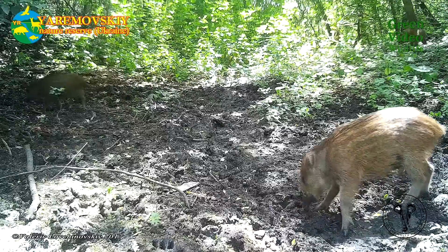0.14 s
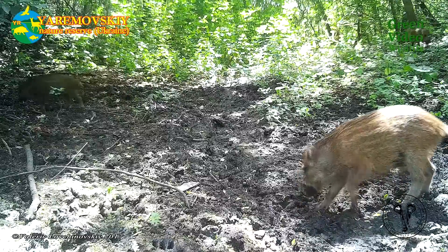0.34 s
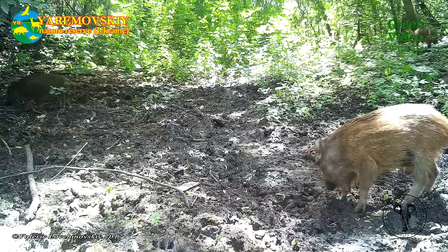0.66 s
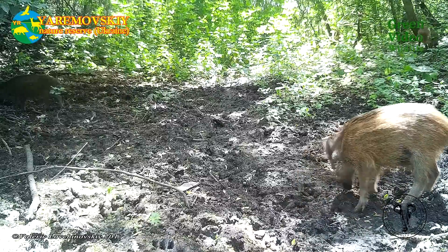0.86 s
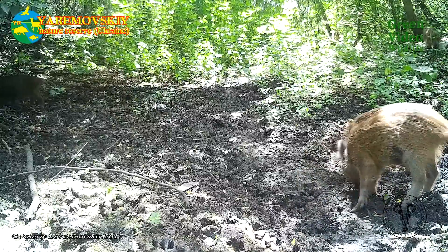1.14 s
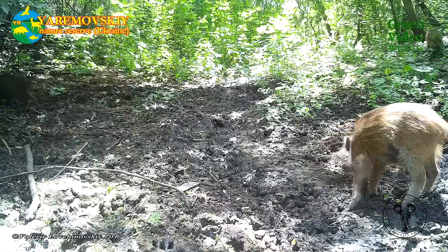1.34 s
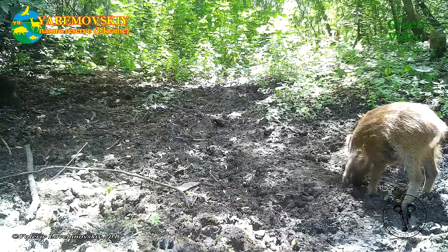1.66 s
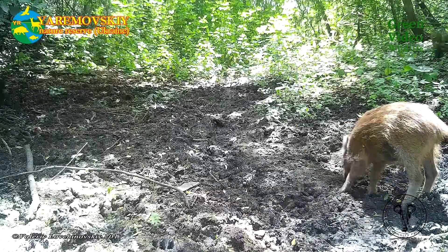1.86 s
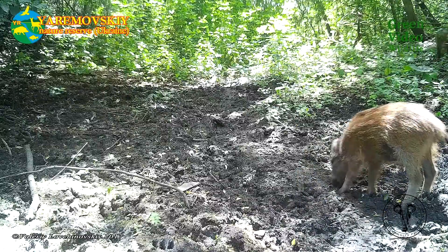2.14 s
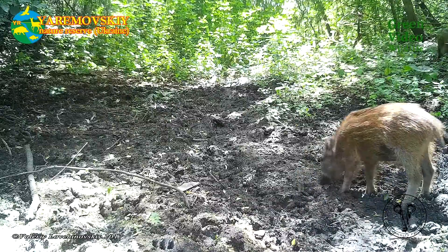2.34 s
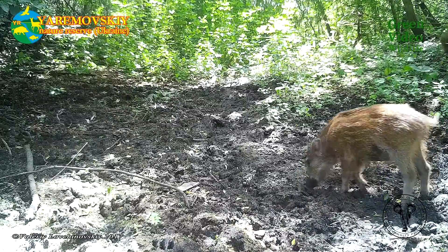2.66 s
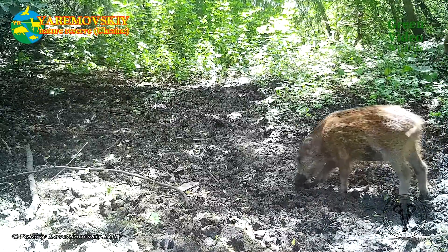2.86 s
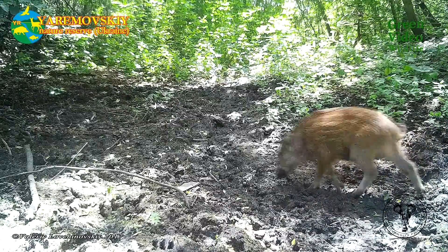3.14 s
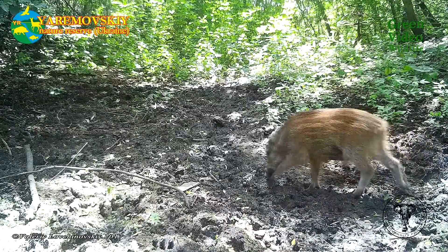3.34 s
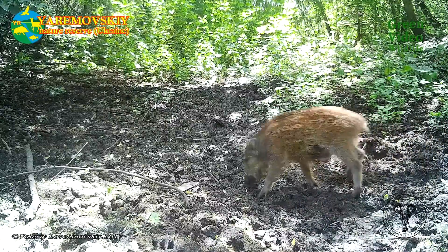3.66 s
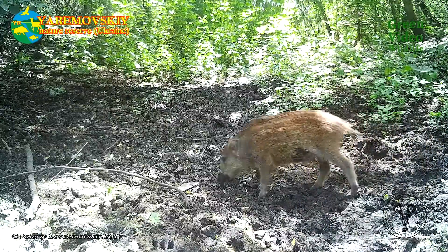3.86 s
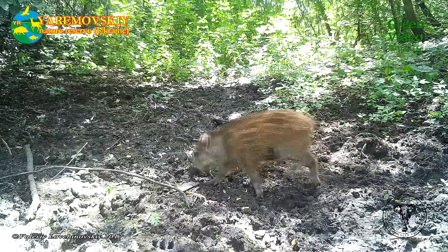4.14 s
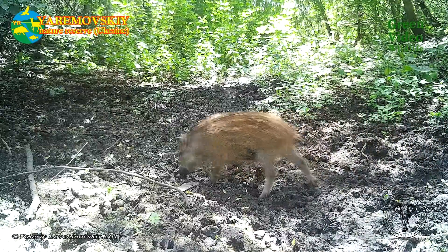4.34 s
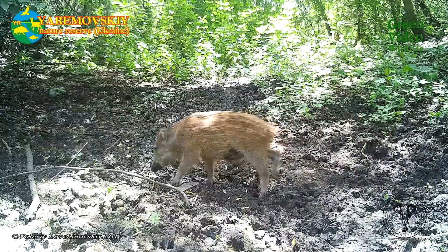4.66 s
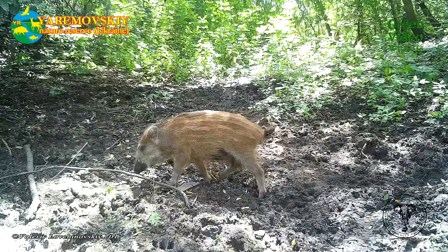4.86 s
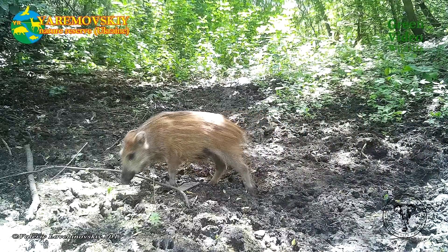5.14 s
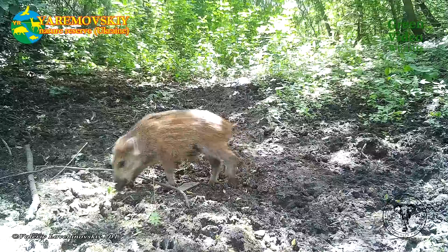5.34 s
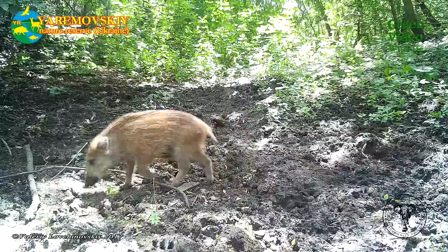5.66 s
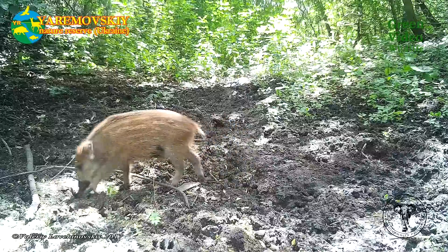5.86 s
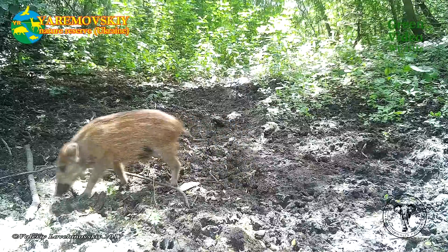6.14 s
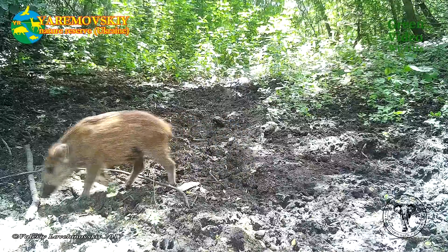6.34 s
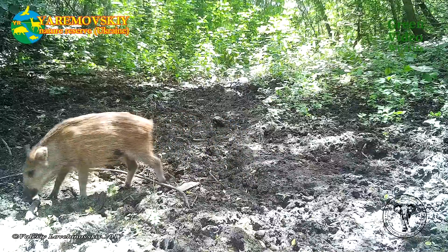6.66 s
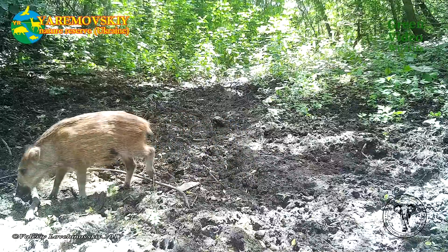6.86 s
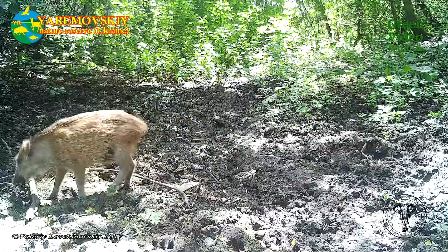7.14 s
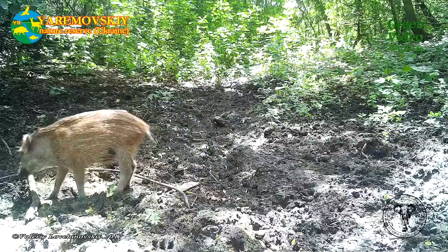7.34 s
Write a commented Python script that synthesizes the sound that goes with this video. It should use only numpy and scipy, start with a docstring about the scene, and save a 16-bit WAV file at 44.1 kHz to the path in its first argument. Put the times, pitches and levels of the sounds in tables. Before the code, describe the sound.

A wild boar piglet grunts in short bursts and roots through crackling forest litter, over a steady hiss of leaves.

```python
"""A muddy forest clearing, where a wild boar piglet roots about close by. Its short grunts follow the
source-filter principle: flapping throat tissue drives the resonances of throat, mouth and snout, while
mucus clicks in the nostrils. Two longer snores rattle through the nose; one soft grunt sounds further off.
Twigs snap and litter crackles under snout and hooves, and the trunks return a faint echo.
Behind it all, a breeze moves low air and keeps the leaves hissing."""
import sys
import numpy as np
from scipy import signal
from scipy.fft import rfft, irfft, next_fast_len
from scipy.io import wavfile
from scipy.ndimage import map_coordinates

SR = 44100
rng = np.random.default_rng(int(sys.argv[2]) if len(sys.argv) > 2 else 0)


def put_to_file(sound):
    """Save the sound as 16-bit audio at rate SR, in the file named by the first command-line argument."""
    columns = np.atleast_2d(sound).T  # one column per channel
    safe = np.clip(columns, -1, 1)
    whole_steps = np.round(safe * 32767)
    wavfile.write(sys.argv[1], SR, whole_steps.astype(np.int16))


N = 331191

# Grunts: start_s, end_s, hardest_slap_s, slap_gap_s, slap_fall_db, flutter_db, throat_hz, throat_db,
# mouth_db, snout_hz, snout_db, brightness_db, nostril_hz, nostril_db
GRUNTS = [(0.177, 0.229, 0.204, 0.018, 5, 2, 355, -15.5, -31, 1300, -37.5, 1.5, 5380, -29),
          (0.562, 0.636, 0.603, 0.015, 2.5, -10, 354.5, -19.5, -38, 1320, -33.5, -1, 4790, -26),
          (0.866, 0.941, 0.901, 0.015, 4.5, 1, 389.4, -16.5, -25, 1148, -32, -2, 5080, -29),
          (1.153, 1.195, 1.193, .02, 5, -4, 504, -16.5, -21.5, 1280, -31, 5, 5060, -28),
          (1.445, 1.505, 1.463, .031, 2.5, -13.5, 484, -20.5, -26.5, 1240, -43, 11.5, 5300, -37),
          (1.8, 1.872, 1.836, .024, 4.5, -12, 474, -18, -31, 1127, -31, 5.5, 5020, -29),
          (2.385, 2.441, 2.407, .016, 2, -12, 531.3, -21, -30.5, 1320, -34.5, -2, 4930, -29),
          (2.763, 2.811, 2.764, .02, 3, -16.5, 440.5, -14.5, -35, 1100, -26, -1, 4580, -26),
          (3.124, 3.174, 3.158, .016, 2.5, -10, 400.4, -15.5, -29, 1133, -31, -4, 4500, -29.5),
          (4.037, 4.098, 4.069, 0.024, 7, -16, 413.7, -24, -36.5, 1290, -42.5, -6, 4650, -33.5),
          (4.424, 4.478, 4.462, 0.02, 16, -14.5, 401.6, -16.5, -39, 1120, -35, -0.5, 4550, -40),
          (4.75, 4.815, 4.781, 0.008, 5, -3, 347.7, -23, -35, 1100, -49, -5, 4880, -27.5)]
# Resonances of the snout: frequency_ratio, level_db, brightness_share
SNOUT_MODES = [(1, -3.5, -0.77), (1.51, 0.5, -0.14), (1.98, 0, 0.95), (2.55, -8.5, 0.91)]
# Bandwidths of the throat, mouth, four snout and nostril resonances: width_hz
TRACT_WIDTHS = [63, 85, 49.6, 59.5, 191, 202, 254]
# Resonances of the soft walls behind the tongue: centre_hz, width_hz, level_db
PHARYNX_MODES = [(305, 71, -2), (151.6, 21, -1)]
# Snore envelopes, one list each: time_s, throat_db, nostril_db
SNORES = [
    [(1.913, -23, -22), (1.917, -21.5, -21), (1.947, -20.5, -19.5), (2.033, -24, -23.5),
     (2.163, -24, -26.5), (2.175, -19, -16), (2.195, -23.5, -28)],
    [(3.2, -37, -29), (3.214, -31, -34), (3.265, -30.5, -37), (3.298, -27.5, -28), (3.35, -30, -42)],
]
# Throat resonances in a snore: centre_hz, width_hz, level_db
SNORE_THROAT_MODES = [(162, 140, -1), (300, 45, 3), (2500, 200, -10.5)]
# Gliding mouth resonances, one list per snore: start_hz, end_hz, width_hz, level_db
SNORE_GLIDES = [
    [(525, 565, 87, -1.5), (1380, 1580, 48, -9), (2840, 3060, 170, -8.5)],
    [(444, 600, 92, -1), (259, 63, 50, -2.5), (1270, 1630, 94, -9)],
]
# Nostril resonances in a snore: centre_hz, width_hz, level_db
SNORE_NOSTRIL_MODES = [(4670, 440, 4.5), (5760, 740, -3.5), (7200, 900, -12)]
# Prominent wet clicks in the nostrils: time_s, level_db
CLICKS = [(0.187, -12), (0.2045, -8), (0.588, 0.5), (0.622, -5.5), (0.631, -6), (0.65, -6.5),
          (0.8705, -9.5), (0.921, -8), (0.95, -4), (0.9556, -5.5), (1.162, -8.5), (1.4665, -8), (1.818, 1),
          (2.173, -2.5), (2.7654, -1), (2.803, -8), (4.0705, -11.5), (4.462, -7)]
# Prominent snaps of twigs and dry leaves: time_s, level_db, pitch_hz
SNAPS = [(.185, -6, 13000), (.7452, -5, 11000), (0.87, -4.5, 9700), (2.568, -7.5, 11800),
         (3.46, -9.5, 5200), (3.503, -9.5, 6200), (3.637, -11, 2800), (4.047, 0, 10900),
         (4.427, -13.5, 9050), (5.046, -14, 5960), (5.078, -5, 9000), (5.494, -13, 8150), (5.56, -6, 6440),
         (6.941, -10.5, 3900)]
# Scuffs of snout and hooves: middle_s, level_db, pitch_hz, width_hz, half_length_s
SCUFFS = [(1.771, -36, 7600, 900, 0.062), (2.29, -33, 5500, 3500, 0.025), (3.501, -28.5, 4000, 5000, 0.025),
          (3.819, -32, 10000, 5000, 0.048), (5.238, -29, 4500, 5000, 0.049),
          (5.386, -29, 9000, 6000, 0.045), (5.571, -27, 3500, 3000, 0.027), (5.905, -28, 3500, 4000, 0.042),
          (6.078, -29.5, 6000, 7000, 0.042), (6.792, -29, 9700, 3500, 0.066)]
# Bouts of rooting: start_s, end_s, level_db
ROOTING_BOUTS = [(0.725, 1.0, -38.5), (1.73, 2.267, -34.5), (3.52, 3.75, -42), (4.93, 5.103, -30.5),
                 (5.3, 5.65, -38)]
# Spectrum of stirred litter: frequency_hz, level_db
LITTER_SPECTRUM = [(1500, -6), (3500, -1), (5500, 6), (8000, 3.5), (11000, -4.5), (15000, -14)]
# Contour of the distant grunt: time_s, pitch_hz, level_db
FAR_GRUNT = [(0.02, 252.5, -63), (0.039, 254, -27), (0.07, 263, -44), (0.088, 282, -26.5), (0.13, 266, -42)]
# Strength of the breeze, heard as leaf hiss: time_s, level_db
BREEZE_LEVELS = [(0.1, -31.5), (0.5, -35.5), (0.8, -31), (1.3, -32), (2.5, -32.5), (2.66, -34.5),
                 (2.95, -31), (3.6, -31), (4.2, -31.5), (5.6, -30), (7.3, -30.3), (7.5, -33)]
# Spectrum of low moving air: frequency_hz, level_db
AIR_SPECTRUM = [(12, -40), (20, -2.5), (54, 2), (80, -1), (245, -1), (339, -4), (400, -5), (622, -16),
                (1000, -14), (1300, -12.5), (2200, -120)]
# Spectrum of hissing leaves: frequency_hz, level_db
LEAF_SPECTRUM = [(290, -25), (500, 5), (545, 0.5), (676, 0.5), (914, -2), (2430, -0.5), (3630, 0),
                 (4380, -0.5), (6550, -2.5), (10100, -8.5), (14400, -22.5), (15500, -29)]
# Treble loss on the path from the ground: frequency_hz, gain_db
PATH_GAIN = [(6000, 1), (8000, 1), (11000, -7.5), (15000, -16)]
# Reverberation time among the trunks: frequency_hz, t60_s
TRUNK_DECAY = [(150, 0.25), (600, 0.26), (4000, 0.42), (12000, 0.067)]

MOUTH_HZ, HARDEST_SLAP_DB = 689, -3


def grunts():
    """Resonances scale with length: those of the snout shift together as it stretches between grunts."""
    out = np.zeros(N)
    for start, end, hardest, gap, fall_db, flutter_db, *shape in GRUNTS:
        throat_hz, throat_db, mouth_db, snout_hz, snout_db, bright_db, nose_hz, nose_db = shape
        snout = [(snout_hz * ratio, snout_db + db + share * bright_db) for ratio, db, share in SNOUT_MODES]
        modes = [(throat_hz, throat_db), (MOUTH_HZ, mouth_db), *snout, (nose_hz, nose_db)]
        add(out, start, grunt(start, end, hardest, gap, fall_db, flutter_db, modes))
    return out


def grunt(start, end, hardest, gap, fall_db, flutter_db, modes):
    """Source and filter: soft flutter sustains the throat tone; hard slaps excite the higher resonances."""
    t = start + np.arange(int((end - start + 0.043) * SR)) / SR
    window = gate(t, start, end - .004, fade_s=0.01)
    slaps = palate_slaps(t, end, hardest, gap, fall_db)
    throat_hz = modes[0][0]
    flaps = amp(flutter_db) * window * flutter(t, throat_hz / 3, jitter=.12, scatter_db=1.0)
    # entrainment: the ringing throat pulls the flaps into step with itself
    beats = np.flatnonzero(flutter(t, throat_hz, jitter=0.062, scatter_db=0))
    locked = np.bincount(beats, np.add.reduceat(flaps, beats), len(t))
    # each slap lets a puff of turbulent air through
    puffs = decay(slaps, tau_s=0.0058) + .08 * window
    air = puffs * rng.standard_normal(len(t))
    sharp = 0.66 * slaps + 0.21 * flaps + 0.049 * air
    throat = highpass(locked + 0.68 * slaps + .013 * air, 0.43 * throat_hz)
    mouth_and_snout = [highpass(sharp, 0.68 * hz) for hz, _ in modes[1:-1]]
    nostrils = highpass(highpass(sharp + 0.098 * air, 2200), 2200)
    forces = [throat, *mouth_and_snout, nostrils]
    # the mouth opens a little, so the tract's resonances climb
    opening = 1 + 0.054 * (np.clip((t - start) / (end - start), 0, 1) - .5)
    voice = amp(-26.5) * unit(resonate(slaps + 0.58 * flaps + 0.016 * air, PHARYNX_MODES))
    for k, (force, (hz, db), width_hz) in enumerate(zip(forces, modes, TRACT_WIDTHS)):
        voice += (-1) ** k * amp(db) * unit(gliding(force, hz * opening, width_hz))
    voice *= np.sqrt((end - start) * SR / len(t))  # levels refer to the sounding part
    # the chest hums on briefly as the throat relaxes
    hum = gate(t, end, end + 0.011, fade_s=0.031) * rng.standard_normal(len(t))
    chest = amp(-33.5) * unit(highpass(cavity(hum, 145, 110), 75))
    return (voice + chest) * gate(t, start, t[-1] - .012, fade_s=.012)


def palate_slaps(t, end, hardest, gap, fall_db):
    """Impulsive excitation: the soft palate slaps shut, building to its hardest slap and easing off."""
    slaps = np.zeros(len(t))
    for k in range(-2, 3):
        time = hardest + k * (gap + 0.0004 * rng.standard_normal())
        if t[0] - .004 < time < end:
            add(slaps, time - t[0], amp([HARDEST_SLAP_DB - fall_db * k ** 2]))
    return slaps


def flutter(t, rate_hz, jitter, scatter_db):
    """Flapping tissue makes a quasi-periodic pulse train, uneven in period and amplitude."""
    gaps, sizes = rng.standard_normal((2, 256))
    at = np.round(np.cumsum(np.exp(jitter * gaps)) / rate_hz * SR).astype(int)
    at -= at[0]
    inside = at < len(t)
    return np.bincount(at[inside], amp(scatter_db * sizes)[inside], len(t))


def snores():
    """Forced vibration: a ragged rattle of the palate drives the throat, opening mouth and wet nostrils."""
    out = np.zeros(N)
    for envelope, glides in zip(SNORES, SNORE_GLIDES):
        start, end = envelope[0][0], envelope[-1][0]
        t = np.arange(start, end + .01, 1 / SR)
        throat_db, nostril_db = curves(envelope, t)
        rattle = flutter(t, rate_hz=190, jitter=.13, scatter_db=2.6)
        force = rattle + 0.013 * rng.standard_normal(len(t))
        throat = amp(-4.5) * unit(highpass(cavities(force, SNORE_THROAT_MODES), 120))
        for start_hz, end_hz, width_hz, db in glides:
            mouth = gliding(highpass(force, 0.67 * start_hz), np.linspace(start_hz, end_hz, len(t)), width_hz)
            throat += amp(db - 1.5) * unit(mouth)
        spray = decay(rattle, tau_s=.0009) * rng.standard_normal(len(t))
        nose = cavities(rattle + .14 * spray, SNORE_NOSTRIL_MODES)
        snore = amp(throat_db) * throat + amp(nostril_db) * unit(highpass(nose, 4400))
        add(out, start, snore * gate(t, start + 0.0032, end - .002, fade_s=0.005))
    return out


def nostril_clicks(extra_db=-10.5, spread_db=6.5):
    """Impulse response: bursting mucus films ring the nose at the nearest grunt's nostril resonance."""
    out, t = np.zeros(N), np.arange(SR // 30) / SR
    starts, ends, *_, nose_hz, _ = np.transpose(GRUNTS)
    extras = [(rng.uniform(start, end), rng.normal(extra_db, spread_db)) for start, end in zip(starts, ends)]
    for time, db in CLICKS + extras:
        burst = 0.1 * amp(-60 * t / 0.014) * rng.standard_normal(len(t))
        burst[0] += 1
        nearest = np.argmin(np.abs(starts - time))
        click = highpass(cavity(burst, nose_hz[nearest], width_hz=590), 3100)
        add(out, time, amp(db) * click / np.abs(click).max())
    return out


def snaps(faint_count=8, faint_db=-20.5, faint_hz=7150):
    """Brittle fracture: a twig or leaf releases its strain in a sharp crack and a short crumble."""
    out, t = np.zeros(N), np.arange(SR // 20) / SR
    faint = [(rng.uniform(0, N / SR), rng.normal(faint_db, 2.2), faint_hz * rng.lognormal(0, 0.27))
             for _ in range(faint_count)]
    for time, db, hz in SNAPS + faint:
        crack, crumble = amp(-60 * t / 0.0067), 0.2 * amp(-60 * t / 0.16)
        fracture = (crack + crumble) * rng.standard_normal(len(t))
        snap = highpass(resonate(fracture, [(hz, 2800, 0), (8000, 7000, -11)]), 1500)
        add(out, time, amp(db) * snap / np.abs(snap).max())
    return out


def scuffs(cracks_per_s=2500):
    """Shot noise: each push through the litter swells and fades as a cloud of tiny independent cracks."""
    out = np.zeros(N)
    for middle, db, hz, width_hz, half_length in SCUFFS:
        swell = np.hanning(int(2 * half_length * SR))
        cracks = (rng.random(len(swell)) < cracks_per_s / SR) * rng.standard_normal(len(swell))
        add(out, middle - half_length, amp(db) * swell * unit(resonate(cracks, [(hz, width_hz, 0)])))
    return out


def rooting(t, attack_s=.08, settle_s=0.16, rest_db=-44, grains_per_s=220):
    """Incoherent sources add in power: the snout stirs grains of litter in bouts, over a faint rustle."""
    power = amp(rest_db) ** 2
    for start, end, db in ROOTING_BOUTS:
        rise = np.clip((t - start) / attack_s + 1, 0, 1)
        settle = np.exp(-np.maximum(t - end, 0) / settle_s)
        power += (amp(db) * rise * settle) ** 2
    grains = (rng.random(N) < grains_per_s / SR) * rng.random(N) ** 2
    crumble = decay(grains, tau_s=0.014) + 0.13
    level = np.sqrt(power) * amp(1.5 * wobble(16))
    return level * unit(colour(crumble * rng.standard_normal(N), LITTER_SPECTRUM))


def far_grunt(t):
    """A soft closed-mouth note, nearly a pure tone: one sinusoid gliding in pitch and level."""
    hz, db = curves(FAR_GRUNT, t)
    tone = np.sqrt(2) * np.sin(2 * np.pi * np.cumsum(hz) / SR)
    return amp(db) * tone * gate(t, FAR_GRUNT[0][0], FAR_GRUNT[-1][0], fade_s=0.017)


def breeze(t, air_mean_db=-35.5, air_coupling=0.46):
    """Flow noise: one breeze modulates the hiss of the leaves and, more weakly, the low moving air."""
    leaf_db, = curves(BREEZE_LEVELS, t)
    air_db = air_mean_db + air_coupling * (leaf_db - leaf_db.mean())
    air = amp(air_db + 0.81 * wobble(6.4)) * unit(colour(rng.standard_normal(N), AIR_SPECTRUM))
    leaves = amp(leaf_db + 0.34 * wobble(8.1)) * unit(colour(rng.standard_normal(N), LEAF_SPECTRUM))
    return air + leaves


def trunk_echo(x):
    """Scattering from the trunks leaves a short diffuse tail, each band decaying at its own rate."""
    hz, t, bands = signal.stft(rng.standard_normal(SR // 2), SR, nperseg=256)
    bands = bands * amp(-60 * t / along(TRUNK_DECAY, hz)[:, None])
    _, tail = signal.istft(bands, SR, nperseg=256)
    return signal.fftconvolve(x, np.pad(tail, (400, 0)) / np.linalg.norm(tail))[:N]


def cavity(x, hz, width_hz):
    """An air cavity resonates at hz and attenuates what lies above."""
    return filtered(x, lambda f: hz * width_hz / (hz * hz - f * f + 1j * f * width_hz))


def cavities(x, modes):
    """Cavity modes add in parallel, alternating in sign."""
    return sum((-1) ** k * amp(db) * cavity(x, hz, width) for k, (hz, width, db) in enumerate(modes))


def gliding(x, hz, width_hz):
    """A damped resonator whose natural frequency moves while it rings."""
    turn = np.exp(2j * np.pi * np.cumsum(hz) / SR)
    return np.imag(turn * decay(x / turn, tau_s=1 / (np.pi * width_hz)))


def resonate(x, modes):
    """Band-pass resonances add in parallel."""
    return filtered(x, lambda f: sum(amp(db) * 1j * f * width / (hz * hz - f * f + 1j * f * width)
                                     for hz, width, db in modes))


def decay(x, tau_s):
    """Each impulse relaxes exponentially."""
    return signal.lfilter([1], [1, -np.exp(-1 / (tau_s * SR))], x)


def highpass(x, hz):
    """A causal second-order low cut."""
    return signal.sosfilt(signal.butter(2, min(hz, SR / 4), "high", fs=SR, output="sos"), x)


def filtered(x, response):
    """Linear filtering multiplies the spectrum by a frequency response."""
    size = next_fast_len(len(x) + 8192)
    return irfft(rfft(x, size) * response(np.fft.rfftfreq(size, 1 / SR)), size)[:len(x)]


def colour(x, spectrum):
    """Zero-phase filtering by a curve in decibels."""
    return filtered(x, lambda hz: amp(along(spectrum, hz)))


def along(points, hz):
    """Interpolation on a logarithmic frequency axis."""
    frequencies, values = np.transpose(points)
    return np.interp(np.log(hz + 1), np.log(frequencies + 1), values)


def curves(rows, t):
    """Linear interpolation in time, one curve per later column."""
    times, *columns = np.transpose(rows)
    return [np.interp(t, times, column) for column in columns]


def wobble(knots_per_s):
    """Smooth random modulation."""
    knots = rng.standard_normal(int(N * knots_per_s / SR) + 4)
    return map_coordinates(knots, [np.arange(N) * knots_per_s / SR])


def gate(t, start, end, fade_s):
    """A trapezoidal envelope, 1 from start to end."""
    return np.clip((t - start) / fade_s + 1, 0, 1) * np.clip((end - t) / fade_s + 1, 0, 1)


def amp(db):
    """Decibels to amplitude ratio."""
    return 10 ** (np.asarray(db) / 20)


def unit(x):
    """Normalisation to rms 1."""
    return x / np.sqrt(np.mean(x ** 2) + 1e-20)


def add(out, start_s, x):
    """Superposition of x on out."""
    i = max(round(start_s * SR), 0)
    out[i:i + len(x)] += x[:len(out) - i]


def scene():
    """Direct sound, echo and forest background superpose, alike in both channels."""
    t = np.arange(N) / SR
    piglet = colour(grunts() + snores() + nostril_clicks() + snaps() + scuffs(), PATH_GAIN)
    mono = piglet + amp(-14.5) * trunk_echo(piglet) + far_grunt(t) + breeze(t) + rooting(t)
    return np.array([mono, mono])


def record(dry, top_hz=15250):
    """Hard clipping flattens peaks beyond full scale; band limiting removes the highest treble."""
    return np.array([filtered(channel, lambda hz: hz < top_hz) for channel in np.clip(dry, -1, 1)])


dry = scene()
out = record(dry)
put_to_file(out)
```